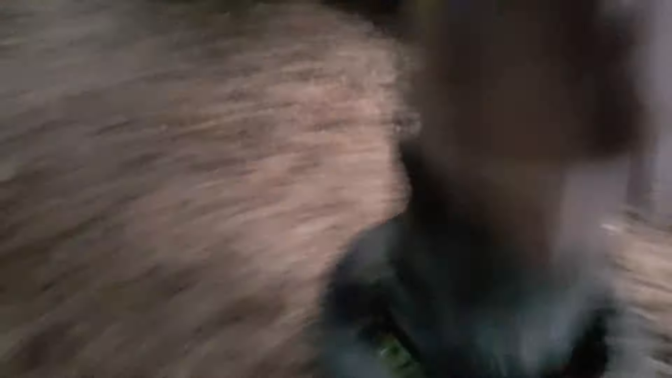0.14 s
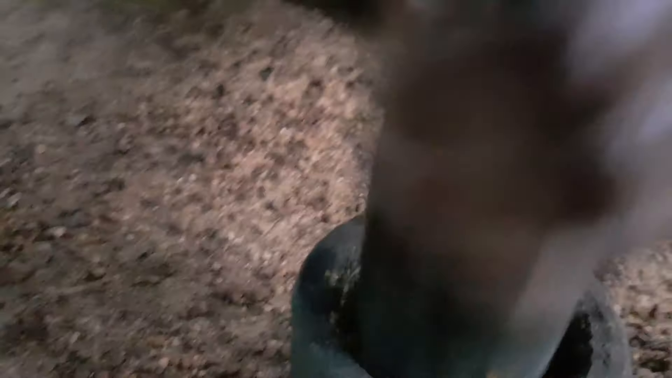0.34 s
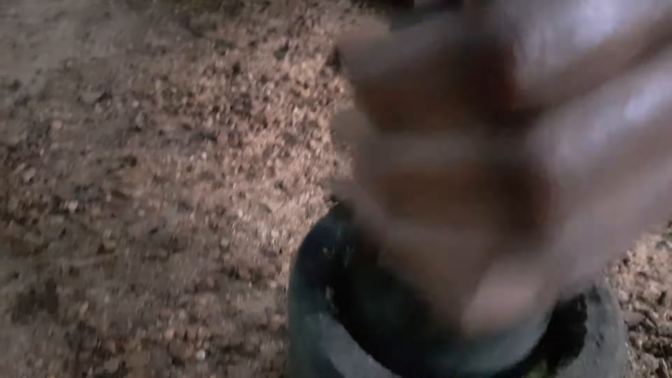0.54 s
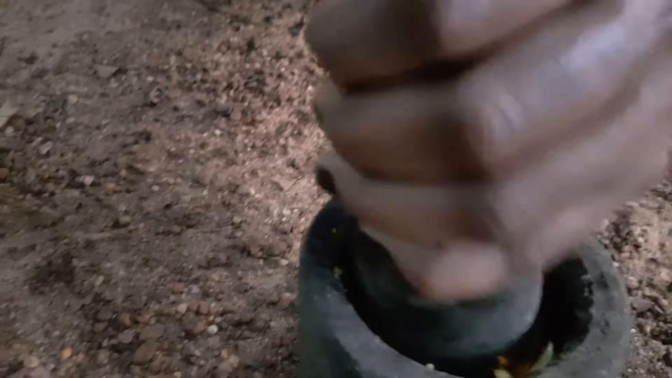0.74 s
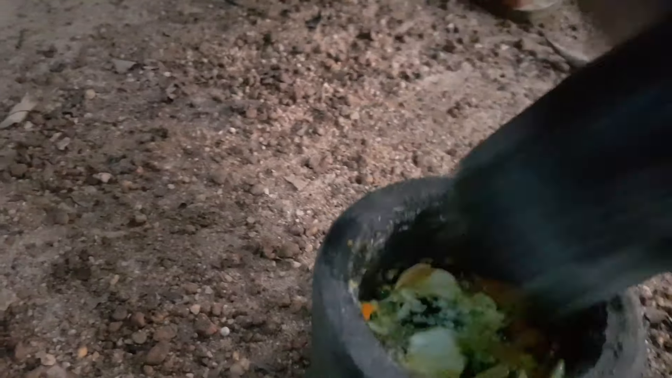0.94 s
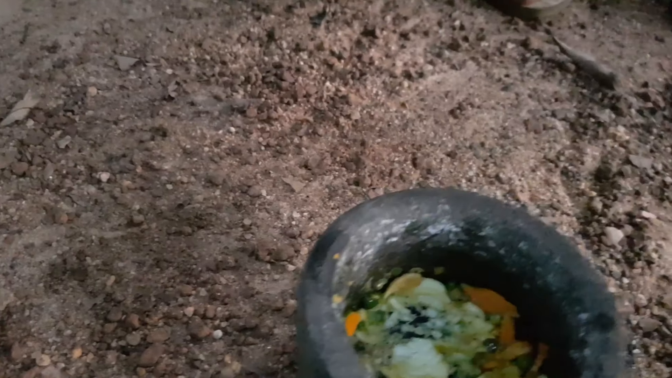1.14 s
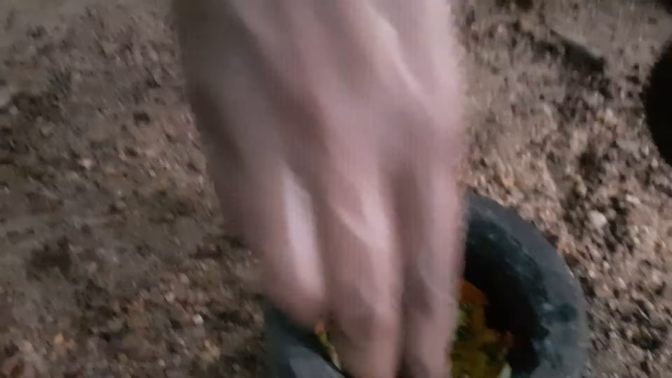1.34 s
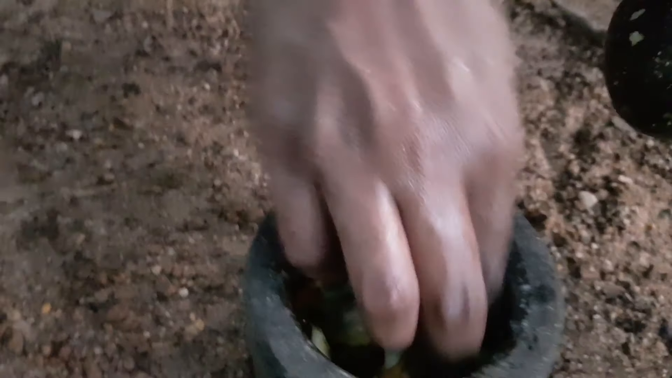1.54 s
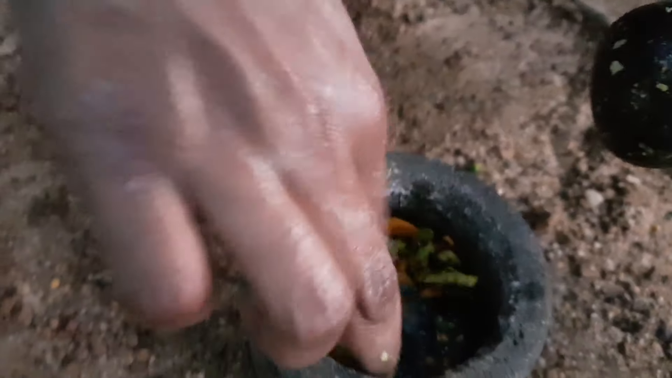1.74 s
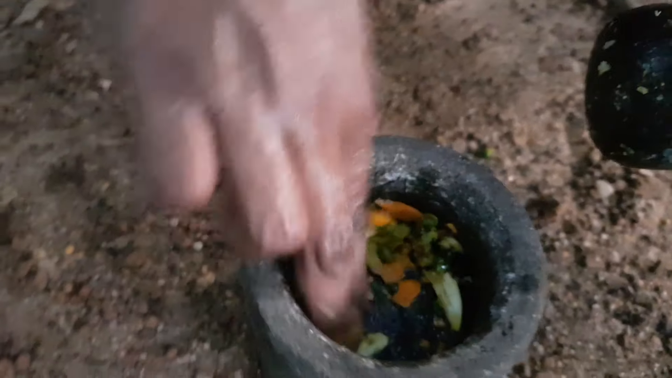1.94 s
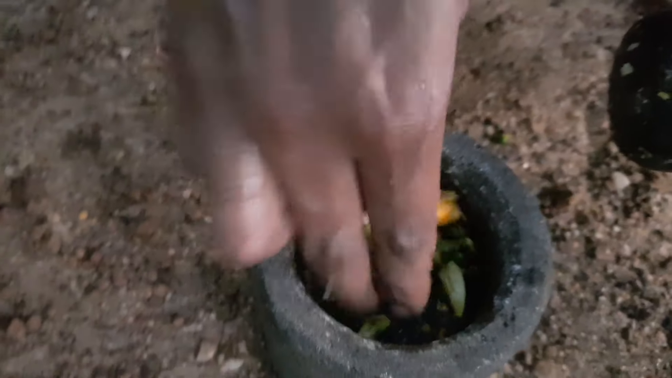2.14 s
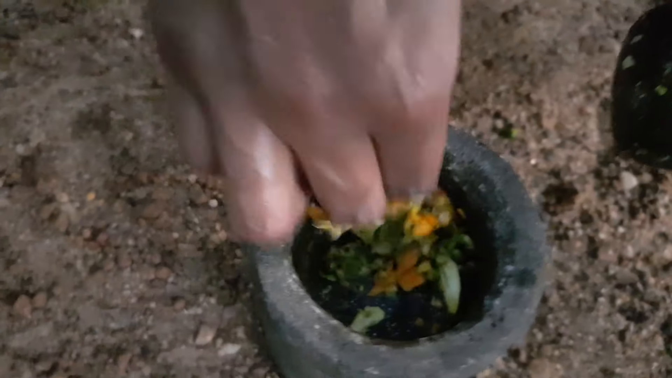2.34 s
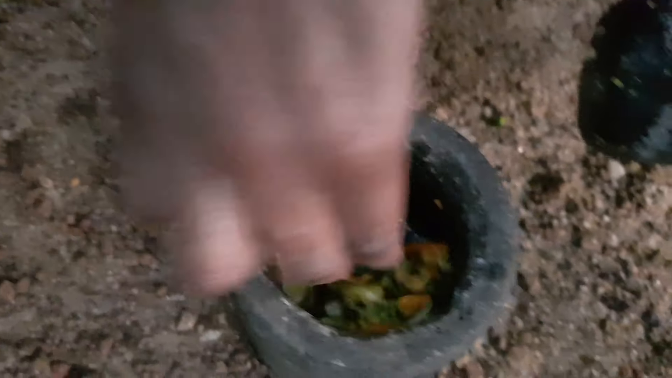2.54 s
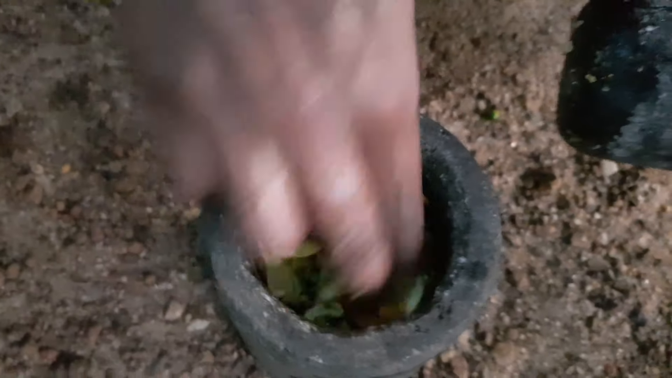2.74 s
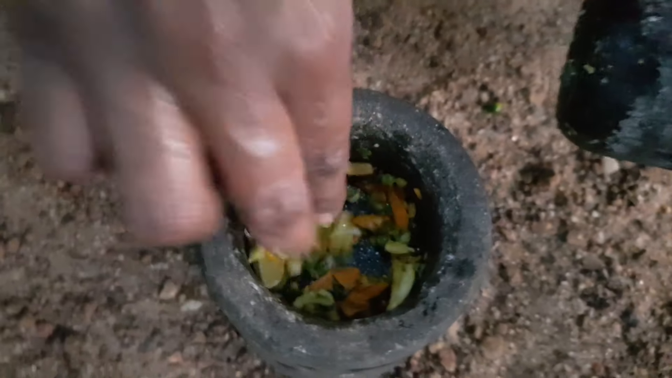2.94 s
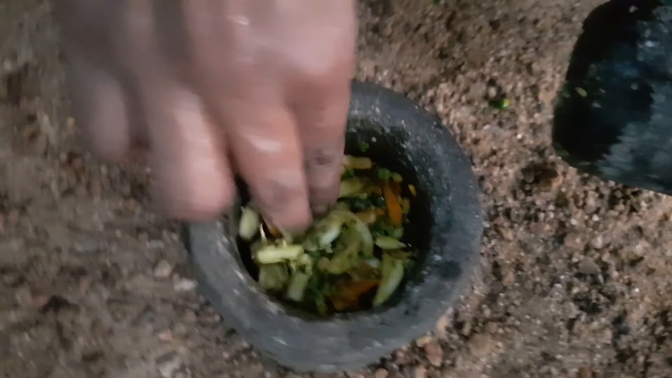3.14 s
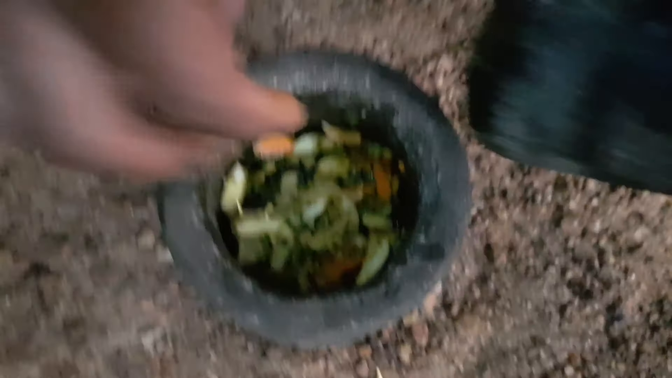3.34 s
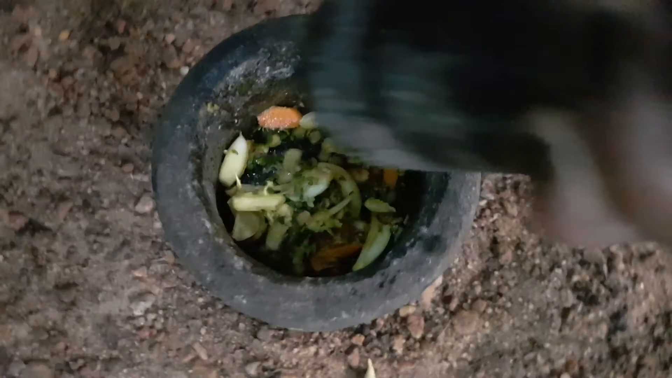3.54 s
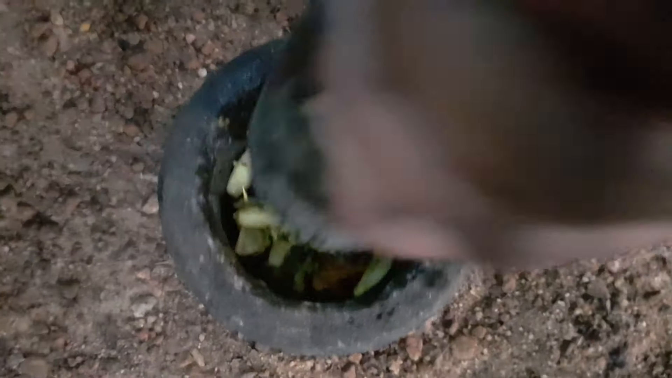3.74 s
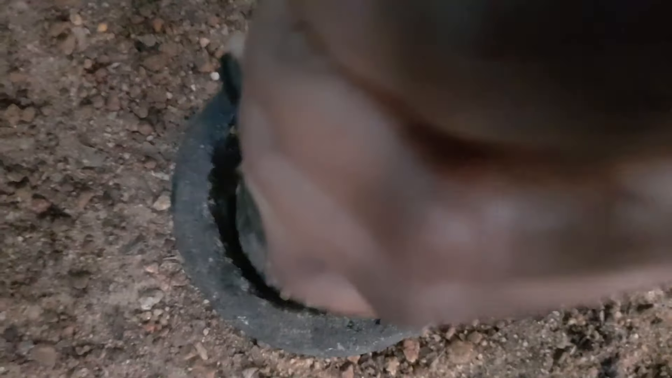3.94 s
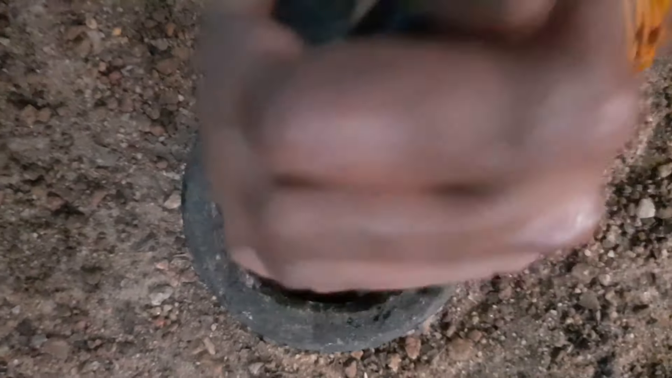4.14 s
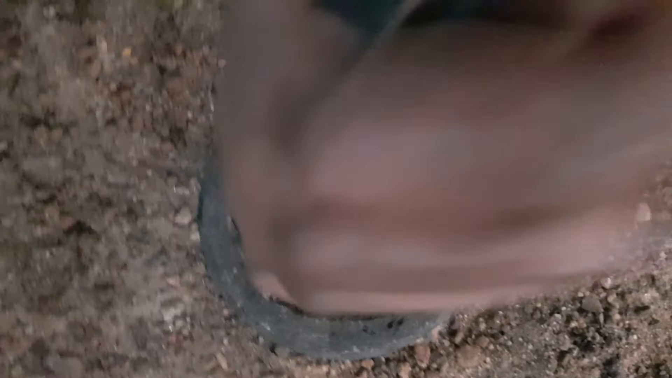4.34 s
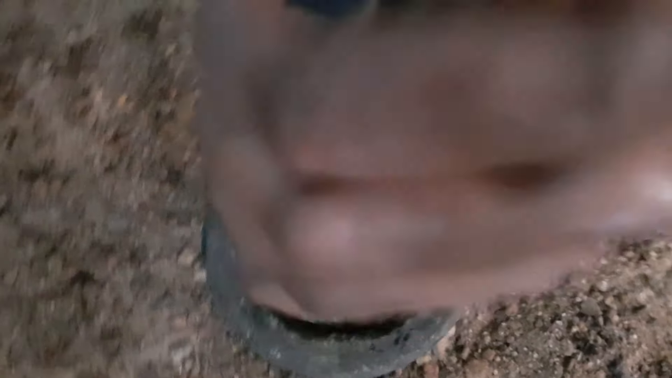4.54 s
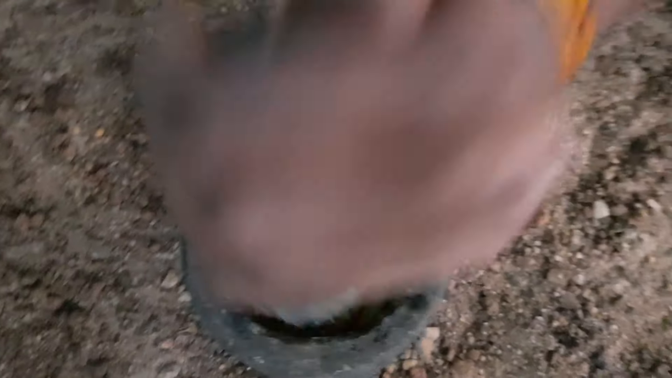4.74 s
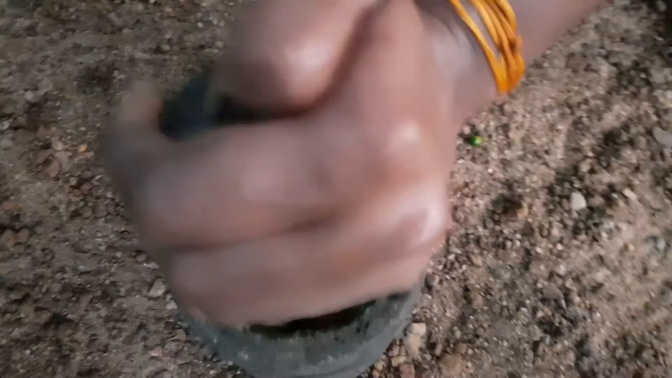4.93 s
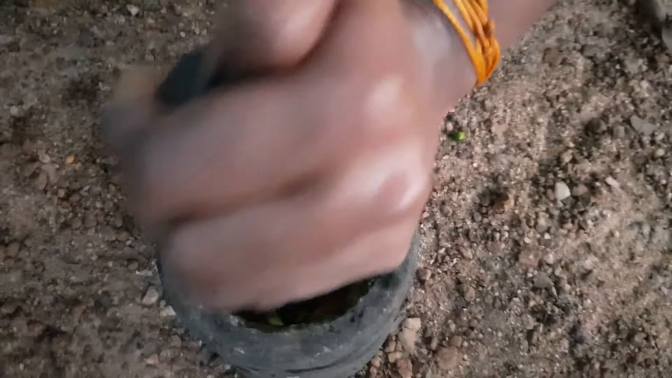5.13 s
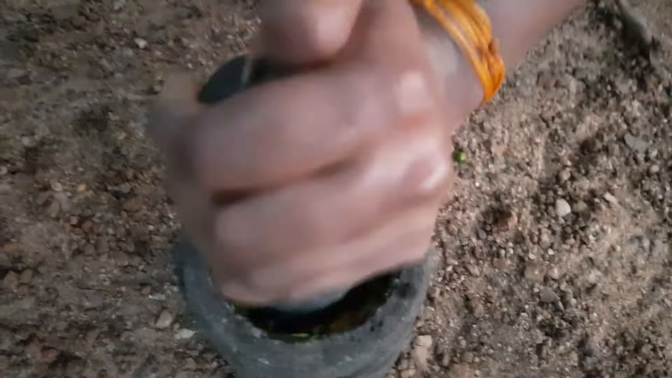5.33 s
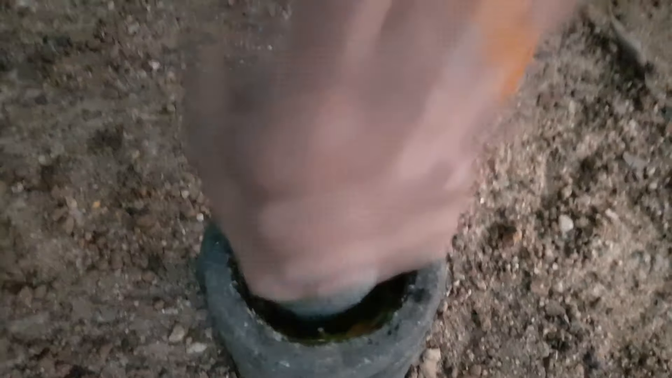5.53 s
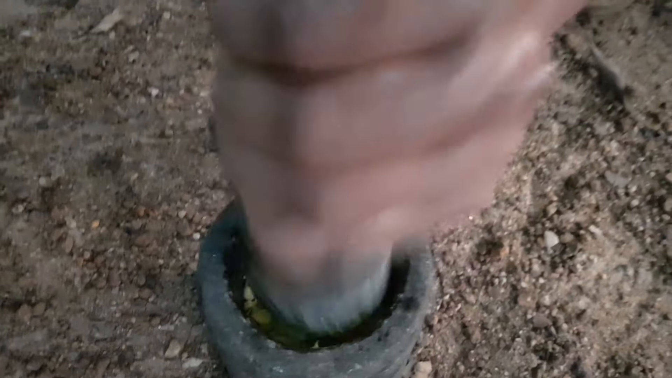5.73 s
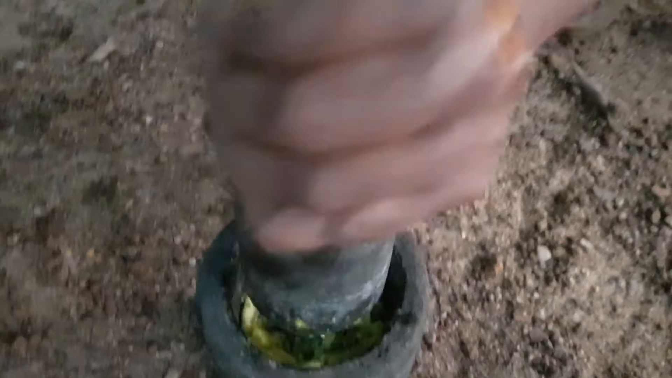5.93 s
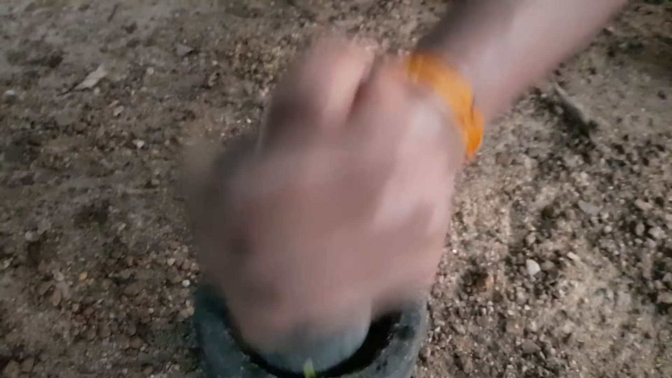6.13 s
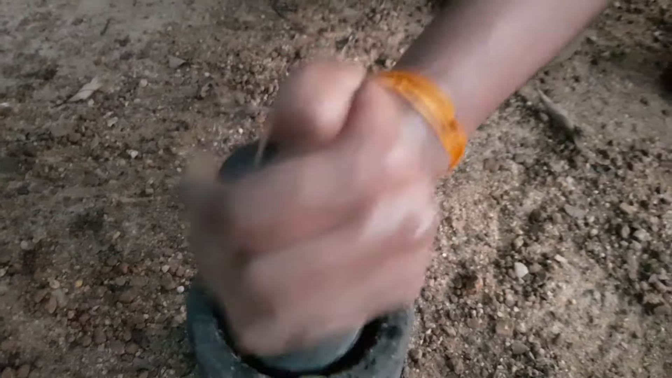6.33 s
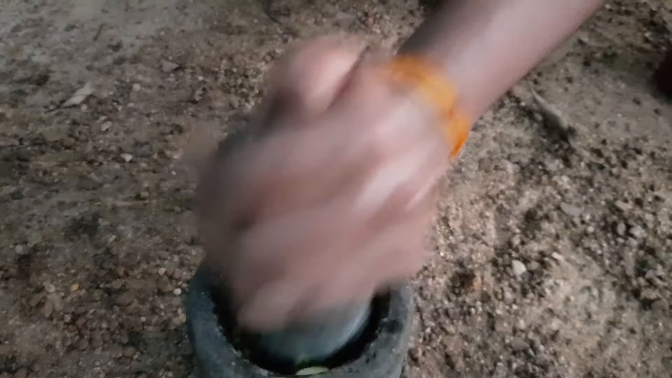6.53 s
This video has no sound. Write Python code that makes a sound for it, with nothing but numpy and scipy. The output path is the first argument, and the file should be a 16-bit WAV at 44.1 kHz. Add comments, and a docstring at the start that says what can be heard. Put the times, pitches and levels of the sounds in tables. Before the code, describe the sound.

Very close outdoors, a stone pestle strikes wet pulp in a stone mortar three times, with hard clacks and dull thumps into earth. It scrapes out, then fingers rustle faintly in moist pieces. The pestle clacks and drags back over the rim, and brisk pounding resumes at over four blows a second, crunchier and heavier, until an abrupt end. Soft rumble and hiss lie underneath.

```python
"""Stone mortar and pestle

A stone pestle pounds fresh spices in a stone mortar on bare earth, close to the microphone.
Blows crush wet pulp (shaped noise) and thump the ground (pulses into two resonances).
Stone clacks on stone (cracks and damped modes) and the pestle rings faintly.
Midway the pestle rests while fingers scrape in more pieces (crackling noise); it drags over
the rim (stick-slip clacks) and pounding resumes, over rumble, hiss and a faint far hum."""
import sys
import numpy as np
from scipy import signal
from scipy.fft import rfft, irfft, next_fast_len
from scipy.io import wavfile

SR = 44100
rng = np.random.default_rng(int(sys.argv[2]) if len(sys.argv) > 2 else 0)


def master(y):
    """Save y as 16-bit WAV."""
    cut = np.clip(np.atleast_2d(y).T, -1, 1)
    pcm = np.round(cut * 32767)  # scale
    wavfile.write(sys.argv[1], SR, pcm.astype(np.int16))


N = 294572
T = np.arange(N) / SR
TOP_HZ = 16000  # upper limit of the sound

# blows on the pulp, levels relative within each layer: (time [s], thump level [dB], push spread [ms],
# crush level [dB], crush treble [dB], knock level [dB], bowl pitch [Hz], knock lead over the thump [ms])
PULP_BLOWS = [(0.0673, -5.5, 0.39, -14.5, -2, 1.5, 1344, 2.82),
              (0.2816, -8.5, .6, -21, 0, -1.5, 1690, 2.47), (.504, -15, 0.62, -16.5, -1, -20, 1393, 2.5),
              (3.9528, -10.5, 0.82, -14, 1, -5, 1450, 0.31), (4.194, -4.5, 0.79, -15, 7.5, -14, 1640, 2),
              (4.4215, -2.5, 0.65, -6, 4, -11.5, 1690, 1.5),
              (4.6537, -4.5, 0.54, -7.5, -2.5, -2, 1504, 6.7), (4.8827, 0, .55, -6.5, 3, -2, 1575, 3.36),
              (5.1139, -6, 0.68, -14, -3.5, -3, 1856, 3), (5.3475, -.5, .45, -8.5, -1.5, 1.5, 1730, 3.275),
              (5.576, -8, 0.66, -6, -6.5, -5.5, 1490, 5.6), (5.8067, -3, .48, -10.5, 1, -28, 1380, 2.5),
              (6.0654, -10, 0.49, -15.5, 8, -21, 1500, 2.5), (6.2466, -6, 0.65, -15, -2, -11.5, 987, 1.69)]


def undb(db):
    """Decibels to gain."""
    return 10 ** (np.asarray(db) / 20)


def unit(x):
    """Scale to an rms of 1."""
    return x / np.sqrt(np.mean(x ** 2))


def add(out, s, sound):
    """Mix a sound in at a time."""
    i = int(round(s * SR))
    out[:, i:i + sound.shape[-1]] += sound[..., :N - i]


def gains(points, size):
    """Interpolate a (Hz, dB) colour over log frequency onto the bins of a transform."""
    hz, db = np.transpose(points)
    bins_hz = np.fft.rfftfreq(size, 1 / SR)
    return undb(np.interp(np.log(bins_hz + 1), np.log(hz), db))


def colour(x, points):
    """Give noise a colour, at an rms of 1."""
    size = x.shape[-1]
    return unit(irfft(rfft(x) * gains(points, size), size))


def band(x, hz, kind):
    """Second-order low-pass or high-pass."""
    return signal.sosfilt(signal.butter(2, hz, kind, fs=SR, output="sos"), x)


def pair(likeness, size):
    """Left and right noise with a given correlation."""
    mid, side = rng.standard_normal((2, size))
    shared = np.sqrt(1 + likeness) * mid
    opposed = np.sqrt(1 - likeness) * np.array([side, -side])
    return (shared + opposed) / np.sqrt(2)


def pan(db):
    """Gains for a left minus right level."""
    return undb(np.array([[db], [-db]]) / 2)


def swell(peak_s, spread_s):
    """A bell-shaped rise and fall; the spread is its standard deviation."""
    return np.exp(-.5 * ((T - peak_s) / spread_s) ** 2)


def decay(t, t60_s):
    """Exponential fade by 60 dB in t60."""
    return np.exp(-np.log(1000) * t / t60_s)


def click(points, size=512):
    """Minimum-phase pulse of a colour, by folding its cepstrum."""
    cepstrum = irfft(np.log(gains(points, size)))
    cepstrum[1:size // 2] *= 2
    cepstrum[size // 2 + 1:] = 0
    return irfft(np.exp(rfft(cepstrum)))


def mode(hz, t60_s):
    """One fading resonance."""
    t = T[:SR // 4]
    return np.sin(2 * np.pi * hz * t) * decay(t, t60_s)


def open_air(rumble_top_hz=1000, hiss_bottom_hz=310):
    """A low rumble, alike on both sides, under a wide soft hiss."""
    # (frequency [Hz], level [dB])
    air_colour = [(20, -23.5), (42, 1), (65, -0.5), (92, 2.5), (150, -6.5), (250, -15.5), (450, -25),
                  (800, -33.5), (1900, -35), (2600, -41.5), (4800, -41.5), (8000, -47.5), (11000, -45),
                  (15500, -43)]
    # (time [s], rumble level [dB], hiss level [dB])
    air_levels = [(0, -53.5, -61), (.9, -56.5, -62.5), (2.6, -48.5, -56.5), (3.5, -41, -50),
                  (4.3, -40.5, -53), (5.4, -44.5, -56.5), (6.4, -45, -55.5)]
    s, rumble_db, hiss_db = np.transpose(air_levels)
    rumble = unit(band(colour(pair(0.9, N), air_colour), rumble_top_hz, "low"))
    hiss = unit(band(colour(pair(.3, N), air_colour), hiss_bottom_hz, "high"))
    return rumble * undb(np.interp(T, s, rumble_db)) + hiss * undb(np.interp(T, s, hiss_db))


def hum(waver_hz=24):
    """A faint far tone: a gliding carrier, its two quadratures modulated by slow noise."""
    # (time [s], pitch [Hz], level [dB])
    hum_track = [(0, 488, -62.5), (1.1, 490, -75.5), (2.0, 447.6, -61), (2.6, 435.3, -64.5),
                 (3.2, 495, -57.5), (3.7, 488.7, -74.5), (5.6, 495, -67.5), (6.0, 499.5, -60.5),
                 (6.4, 493.5, -61)]
    s, pitch_hz, level_db = np.transpose(hum_track)
    phase = 2 * np.pi * np.cumsum(np.interp(T, s, pitch_hz)) / SR
    a, b = band(rng.standard_normal((2, N)), waver_hz, "low")
    tone = unit(a * np.cos(phase) + b * np.sin(phase))
    return undb(np.interp(T, s, level_db)) * tone


def yard(x, wet_db=-31, t60_s=0.26, onset_s=0.0053):
    """Faint scatter from the ground and things around: convolution with a fading noise tail."""
    # (frequency [Hz], level [dB])
    yard_colour = [(200, -2), (800, 5), (1600, 0.5), (3000, 3.5), (6000, -1.5), (10000, -7), (16000, -28)]
    t = T[:SR // 2]
    tail = colour(pair(0.12, len(t)), yard_colour) * decay(t, t60_s) * (1 - np.exp(-t / onset_s))
    tail = unit(tail) / np.sqrt(len(t))
    return undb(wet_db) * signal.fftconvolve(x, tail, axes=1)[:, :N]


def rustle(grain_db=6, lift_s=0.027, lift_spread_s=0.056, patchy_db=2.5, patchy_hz=45):
    """Tiny wet crackles: the pestle leaving the juice after each blow, and fingers gathering pieces."""
    # finger sweeps: (start [s], length [s], relative level [dB])
    sweeps = [(1.304, 0.18, -52), (1.755, 0.15, -51.5), (2.196, 0.14, -55.5), (2.524, 0.17, -59),
              (2.862, 0.1, -56)]
    # (frequency [Hz], level [dB])
    scrape_colour = [(500, -10), (1300, 1.5), (2200, -5), (3200, 0.5), (5000, -0.5), (7500, -3),
                     (11000, -2.5), (16000, -10)]
    juice_db, juice_growth = -50.5, .3  # level after a 0 dB thump; dB per dB of thump
    sweep_gain_db, peak_share, spread_share = 4, 0.44, 0.36  # shares of the sweep length

    juice = sum(undb(juice_db + juice_growth * thump_db) * swell(s + lift_s, lift_spread_s) * (T > s)
                for s, thump_db, *_ in PULP_BLOWS)
    fingers = sum(undb(db + sweep_gain_db) * swell(s + peak_share * length_s, spread_share * length_s)
                  for s, length_s, db in sweeps)
    # pieces stick and let go in small clumps
    clumps = undb(patchy_db * unit(band(rng.standard_normal(N), patchy_hz, "low")))
    grains = pair(0.16, N) * clumps * undb(grain_db * rng.standard_normal(N))
    return (juice + fingers) * colour(grains, scrape_colour)


def thumps(ground_hz=108, ground_width_hz=83, soil_hz=52, soil_width_hz=19):
    """Each blow pushes the heavy mortar into the earth, which springs back in two damped swings."""
    push = sum(undb(db) * swell(s + 0.00022, push_ms / 1000) for s, db, push_ms, *_ in PULP_BLOWS)
    push = push + 1e-18  # keeps the filters off denormals
    for hz, width_hz in (ground_hz, ground_width_hz), (soil_hz, soil_width_hz):
        swing = [1, 2 * np.pi * width_hz, (2 * np.pi * hz) ** 2]
        push = signal.lfilter(*signal.bilinear([1, 0, 0], swing, SR), push)
    return push * pan(-0.91)


def crush(peak_s, db, squeeze_ms, treble_db, grain_db=4, settle_db=-23, settle_s=0.0088, build_s=.002,
          size=4096):
    """Wet noise burst that swells and falls, with a weak settling tail; returns start time and sound."""
    # (frequency [Hz], level [dB])
    pulp_colour = [(300, -13), (550, 1), (900, -11), (1700, 10.5), (2200, 2), (3000, 1.5), (4200, -1),
                   (5200, -0.5), (7500, -4), (10500, -2.5), (13000, -8.5), (16000, -9.5)]
    t = T[:size] - T[size // 4]
    grains = colour(pair(0.34, size) * undb(grain_db * rng.standard_normal(size)), pulp_colour)
    grains = grains + (undb(treble_db) - 1) * band(grains, 3500, "high")
    squeeze = np.exp(-np.abs(t / (squeeze_ms / 1000)) ** 1.5)
    settle = undb(settle_db) * np.exp(-np.abs(t) / np.where(t > 0, settle_s, build_s))
    return peak_s - T[size // 4], undb(db) * (squeeze + settle) * grains


def pulp(lead_s=0.0026, crush_gain_db=2, tick_ms=1.5918):
    """The pulp gives way just before the mortar takes the blow; short wet ticks, mostly as the pestle lifts."""
    # short wet ticks: (time [s], level [dB], treble [dB])
    lift_ticks = [(0.267, -39.5, 0), (.52, -33, 8), (1.8755, -40, 4), (3.4605, -28.5, -8),
                  (4.817, -44.5, -12.5), (6.2536, -36.5, 9.5), (6.2999, -31.5, 0)]
    squeeze_ms, halving_db = 1.2886, 13.5  # squeeze of a 0 dB thump; harder blows are quicker
    out = np.zeros((2, N))
    for s, thump_db, _, db, treble_db, *_ in PULP_BLOWS:
        blow_ms = squeeze_ms * 2 ** (-thump_db / halving_db)
        add(out, *crush(s - lead_s, db + crush_gain_db, blow_ms, treble_db))
    for s, db, treble_db in lift_ticks:
        add(out, *crush(s, db, tick_ms, treble_db))
    return out


def clack(bowl_hz, bowl_db, wall_hz, wall_db, ring_db, contact_db=16, bowl_t60_s=0.017,
          wall_t60_s=0.0085, contact_hz=4500, scatter_db=-17, scatter_t60_s=0.024):
    """Hard contact: a crack, the damped bowl and its wall, and the thin ring of the pestle."""
    # (frequency [Hz], level [dB])
    contact_colour = [(100, -18), (550, -16), (850, -8.5), (1250, 0.5), (1800, 4), (2300, -0.5), (3100, -3),
                      (3700, -10.5), (5500, -30.5), (10000, -36.5), (16000, -33)]
    # ringing of the pestle: (frequency [Hz], relative level [dB], t60 [s])
    pestle_modes = [(7390, -32.5, .09), (7260, -38.5, .055), (14740, -50, .08)]

    bowl = undb(bowl_db - 3.5) * mode(bowl_hz, bowl_t60_s)
    wall = undb(wall_db - 5.0) * mode(wall_hz, wall_t60_s)
    body = band(bowl - wall, contact_hz, "low")  # a film of pulp rounds the contact
    crack = undb(contact_db) * click(contact_colour)
    body[:len(crack)] += crack
    out = -body * pan(-3.5)

    # sound bouncing between bowl, hand and ground
    t = T[:2048]
    scatter = colour(pair(0.61, len(t)), contact_colour) * decay(t, scatter_t60_s)
    scatter = scatter * (1 - np.exp(-t / .0005))
    add(out, 0, undb(scatter_db) * scatter)

    # softer contacts dull wall and crack together: an octave per 9.5 dB of wall level
    treble_limit_hz = min(11100 * 2 ** (wall_db / 9.5), TOP_HZ)
    ring = sum(undb(db + ring_db) * mode(hz, t60_s) for hz, db, t60_s in pestle_modes)
    return band(out, treble_limit_hz, "low") + ring * pan(-10)


def stones(slip_spread_db=3, drag_fade_db=-1.5):
    """Knocks through the pulp, bare clacks, and uneven stick and slip of the pestle dragged over stone."""
    # bare stone on wall or rim, levels relative:
    # (time [s], level [dB], bowl pitch [Hz], wall pitch [Hz], wall level [dB], pestle ring [dB])
    bare_clacks = [(0.0532, -1, 1297, 2830, 7.5, -8.5), (0.4954, -4.5, 1380, 2590, 10.5, -2),
                   (.6806, -30, 1270, 2630, 23.5, 23), (3.2409, -17, 1090, 2830, -34.5, 3.5),
                   (3.309, -33.5, 1120, 2900, -4, 17), (3.362, -27.5, 1300, 2860, -26, 6),
                   (3.447, -29, 1195, 2900, -9, -2), (3.912, 1, 1197, 2990, -12, 1.5),
                   (4.1, -32.5, 1195, 2900, -2, 27.5), (4.323, -21.5, 1196, 2920, -8.5, 14),
                   (4.6354, -7, 1244, 2820, 1.5, -9), (4.9905, -21, 1236, 2670, 6.5, 15),
                   (5.01, -24.5, 1174, 2950, -15, -11), (5.798, -8, 1364, 2965, 10.5, -2.5),
                   (6.0202, 0.5, 1240, 3070, -1, 1), (6.423, -3.5, 1198, 2996, -5.5, -4.5)]
    # pestle sliding over stone, levels relative; a row that ends before it starts is silent:
    # (start [s], end [s], mean gap [ms], slip level [dB], bowl level [dB], wall level [dB], pestle ring [dB])
    drags = [(0.662, 0.758, 3, -39.5, -5, -1, 13.5), (3.372, 3.52, 10.5, -32, 5.5, -22, 12),
             (3.848, 3.944, 2.1, -34.5, -9, -10.5, -7.5), (0.124, .175, 3.7, -59, -1, 5, -9),
             (5.8, 5.735, 4.5, -43, -3.5, -10.5, -9.5), (6.152, 6.175, 4.7, -50, 3.5, -10, -12)]
    slip_hz, slip_scatter = np.array((1239, 2860)), np.array((.06, .04))  # bowl, wall; share of stray

    out = np.zeros((2, N))
    for s, *_, db, hz, ahead_ms in PULP_BLOWS:
        # pulp damps the bowl; the pestle hardly rings
        knock = clack(hz, -0.5, 1.5 * hz, -9.5, -26, bowl_t60_s=0.014)
        add(out, s - ahead_ms / 1000, undb(db) * knock)
    for s, db, bowl_hz, wall_hz, wall_db, ring_db in bare_clacks:
        add(out, s, undb(db) * clack(bowl_hz, 2.5, wall_hz, wall_db, ring_db))
    for start, end, gap_ms, db, bowl_db, wall_db, ring_db in drags:
        slips = start + gap_ms / 1000 * np.cumsum(rng.uniform(.5, 1.5, 40))
        chance = rng.standard_normal((len(slips), 3))
        for s, (force, *stray) in zip(slips[slips < end], chance):
            bowl_hz, wall_hz = slip_hz * (1 + slip_scatter * stray)
            slip = clack(bowl_hz, bowl_db, wall_hz, wall_db, ring_db)
            fade_db = drag_fade_db * (s - start) / (end - start)  # the pressure eases
            add(out, s, undb(db + fade_db + slip_spread_db * force) * slip)
    return out


def ports(x, lag_ms=0.056):
    """Sound from the mortar reaches the right microphone port a little later."""
    size = next_fast_len(N + 64)
    lag = np.exp(-2j * np.pi * np.fft.rfftfreq(size, 1 / SR) * lag_ms / 1000)
    late = irfft(rfft(x[1], size) * lag, size)
    return np.array([x[0], late[:N]])


def scene(clack_spill_db=-7):
    """Mortar and pestle in the open yard."""
    around = open_air() + hum() + rustle()
    pounding, clacks = thumps() + pulp(), stones()
    scattered = yard(pounding + undb(clack_spill_db) * clacks)
    return ports(pounding + clacks) + scattered + around


def record(dry, left_notch_hz=8000, right_notch_hz=8600, notch_width_hz=1500, end_s=6.431):
    """Each microphone port hollows out a treble band, peaks clip, and the sound stops abruptly."""
    hollow = np.array([signal.lfilter(*signal.iirpeak(hz, hz / notch_width_hz, fs=SR), x)
                       for hz, x in zip((left_notch_hz, right_notch_hz), dry)])
    clipped = np.clip(dry - hollow, -1, 1)
    x = clipped * np.clip((end_s - T) * 500, 0, 1)  # 2 ms fade
    return signal.sosfilt(signal.ellip(8, .2, 70, TOP_HZ, fs=SR, output="sos"), x)


dry = scene()
out = record(dry)
master(out)
```